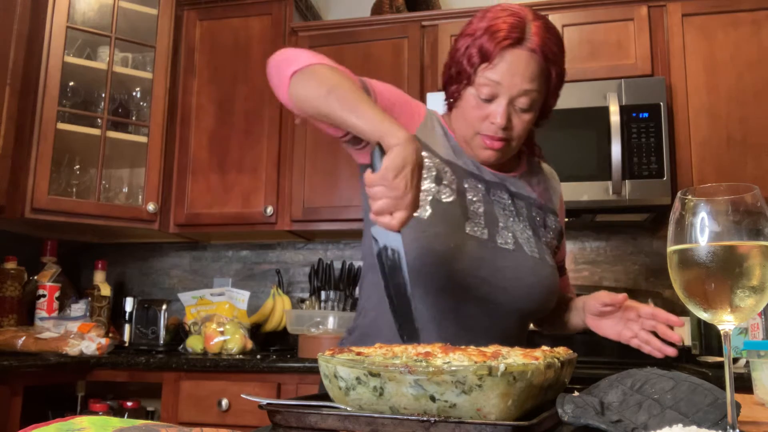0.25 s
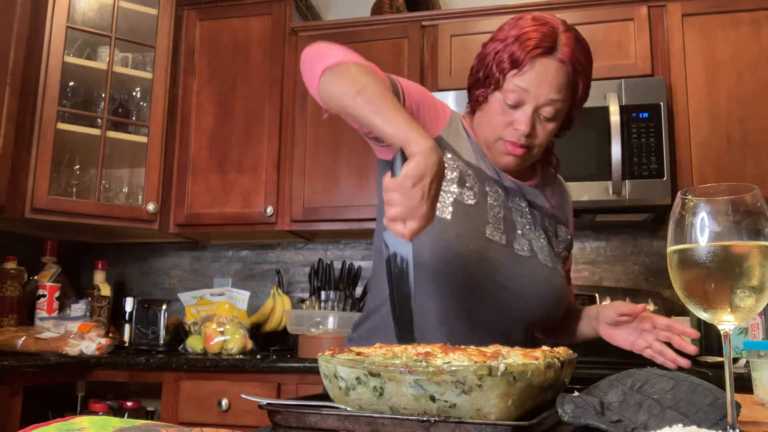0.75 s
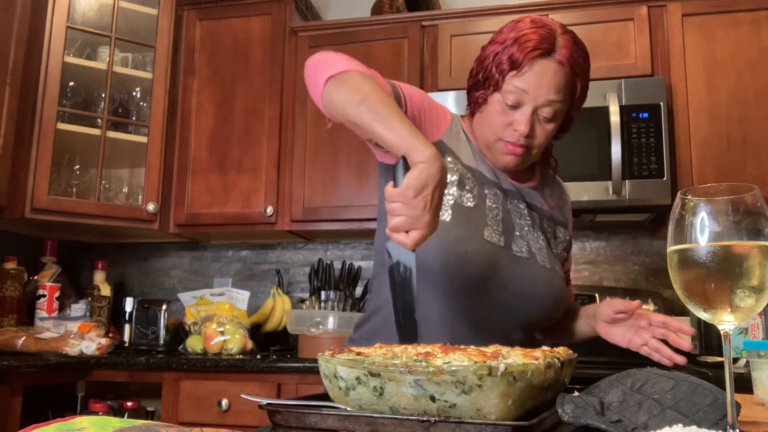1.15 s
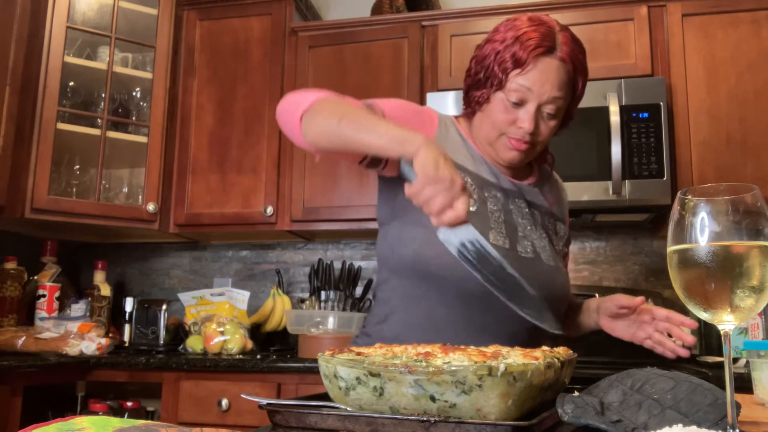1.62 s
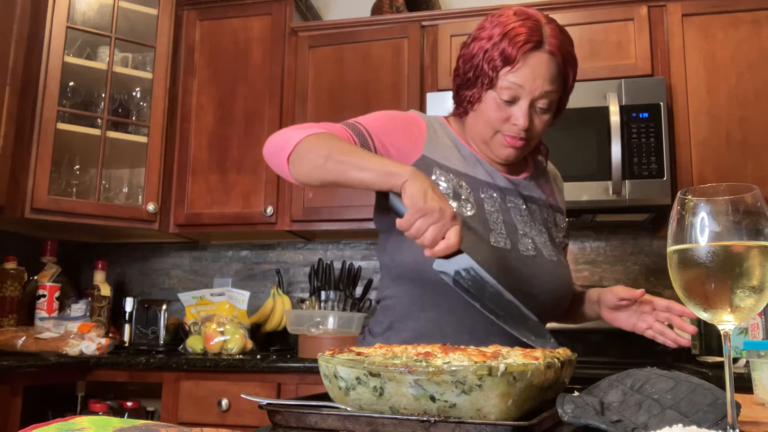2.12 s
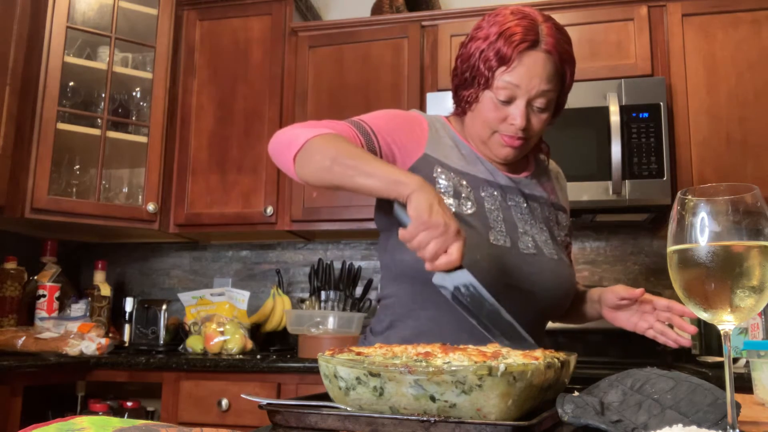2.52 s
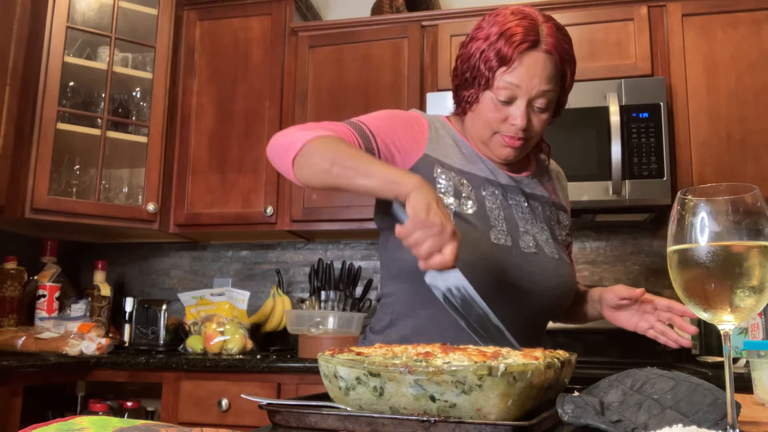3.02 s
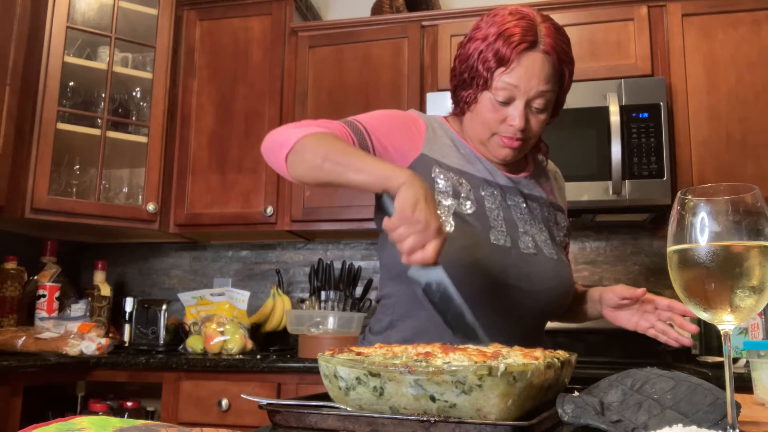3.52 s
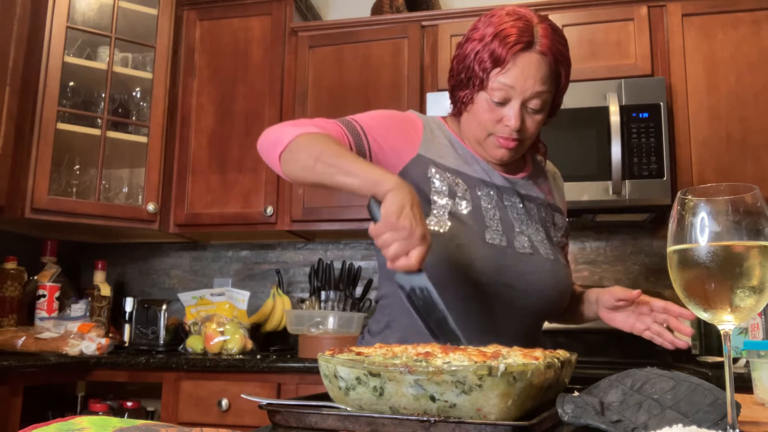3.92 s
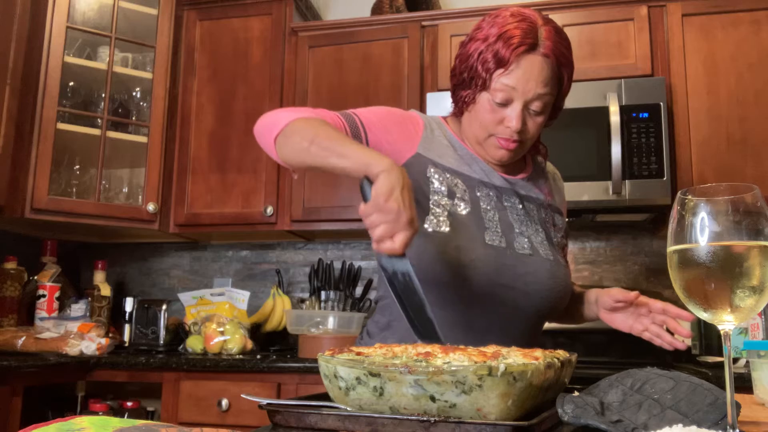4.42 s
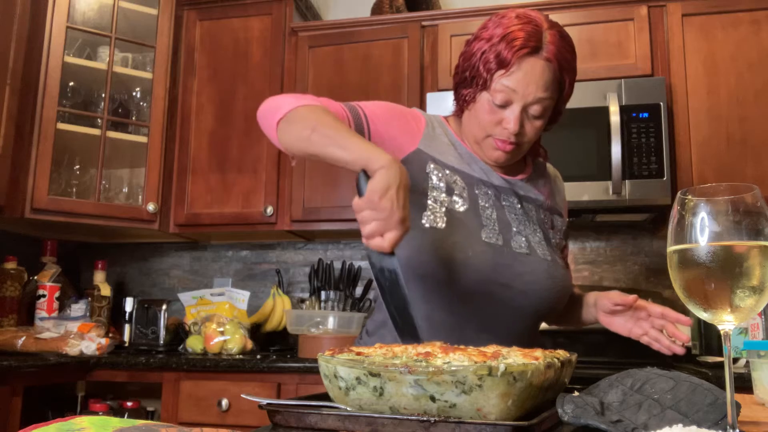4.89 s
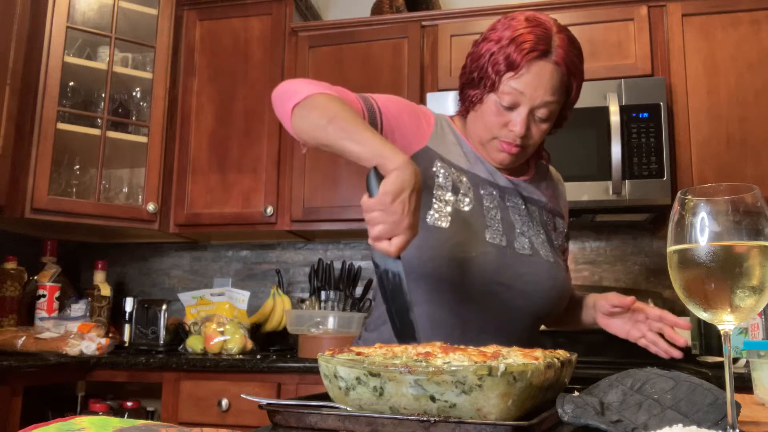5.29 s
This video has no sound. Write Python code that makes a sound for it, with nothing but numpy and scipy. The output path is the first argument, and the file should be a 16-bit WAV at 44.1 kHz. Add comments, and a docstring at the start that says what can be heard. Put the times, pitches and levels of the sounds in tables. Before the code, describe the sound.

A large knife cuts through lasagna in a glass dish on a metal tray, heard from one microphone near the worktop. Each stroke ends in a knock that mixes a worktop thud, a damped glass clunk and a brief ring of the blade. From the start to about 1.4 seconds, light knocks come quickly and unevenly, with the dish chattering on the tray and a faint rasp of crust and sauce. A rattling knock follows at 1.9 seconds and a soft, dull thud at 2.4. The loudest, heaviest knocks land at 2.9 and 3.3 seconds. Cleaner, glassier knocks follow at about 3.6, 4.0, 4.4 and 4.7 seconds. At 5.3 seconds another knock rocks the dish, which rattles until a small tap near 5.5. The kitchen adds a short reverberation, with steady quiet air noise and a low appliance hum behind everything.

```python
"""Cutting lasagna in a kitchen

One microphone near the worktop, where a large knife chops through lasagna in a glass dish on a metal tray.
Each stroke ends in a knock on the bottom: the worktop thuds, the food-damped glass clunks, the blade rings.
Some strokes rock the dish, which chatters on the tray. Crust and sauce hiss softly along the blade.
The room answers with a short reverberation; behind it all lie air noise and a low appliance hum."""
import sys
import numpy as np
from scipy import signal
from scipy.fft import rfft, irfft
from scipy.io import wavfile
from scipy.ndimage import uniform_filter1d

SR = 44100
rng = np.random.default_rng(int(sys.argv[2]) if len(sys.argv) > 2 else 0)


def output_pcm(signal):
    """Save a mono or channel-first signal as 16-bit PCM at the path in sys.argv[1].

    Samples are clipped to [-1, 1] before scaling.
    """
    pcm = np.clip(np.atleast_2d(signal).T, -1, 1) * 32767
    wavfile.write(sys.argv[1], SR, np.round(pcm).astype(np.int16))


N = 244755
TIME = np.arange(N) / SR

# steady air noise of the room: (frequency [Hz], relative density [dB])
AIR_SPECTRUM = [(18, -61), (30, -32), (86, -8.5), (131, -3.5), (153, -20), (184, -5), (345, -3), (374, -20),
                (404, -5), (684, -16.5), (780, -15), (1070, -19.5), (3580, -32), (9460, -52),
                (16000, -43.5)]
# first echoes off worktop, cabinets and ceiling: (delay [s], treble level [dB])
ECHOES = [(.0042, -10.5), (.0073, -25.5), (0.0143, -4.5), (0.0183, -3)]
# kitchen reverberation: (frequency [Hz], t60 [s], energy against the direct sound [dB])
REVERB_BANDS = [(100, 0.22, 7.5), (409, 0.51, -10), (790, 0.53, -2), (1260, 0.71, -2.5), (3000, 0.74, 0.5),
                (6040, 0.69, 1.5), (14300, 0.36, 8.5)]

# edge sliding through the food: (time [s], length [s], relative crust level [dB])
SLICES = [(0.079, 0.041, -45.5), (0.674, 0.053, -60.5), (0.848, 0.069, -59), (0.997, 0.028, -59),
          (1.426, 0.026, -72), (1.99, 0.0046, -67)]
# rasp of the crust: (frequency [Hz], relative density [dB])
CRUST_SPECTRUM = [(800, 5), (1500, 11.5), (3500, 1.5), (6000, -2), (8000, -11), (11000, -16), (16000, -11)]
# sticky crackle of sauce: (frequency [Hz], relative density [dB])
SAUCE_SPECTRUM = [(3000, -8), (10000, -21), (13000, 3), (16000, -14)]
# dull puff of squashed pasta: (frequency [Hz], relative density [dB])
SQUASH_SPECTRUM = [(100, -44), (400, 1.5), (600, -7), (680, -8.5), (770, 1), (870, 2.5), (1000, -10),
                   (1250, -2), (1600, -16), (2700, -23.5), (4000, -34.5)]
# gritty contact of metal and glass: (frequency [Hz], relative density [dB])
CRUNCH_SPECTRUM = [(800, -4.5), (2000, 8.5), (4000, 8), (6000, -1), (7300, -13), (10000, -21),
                   (13000, -19.5), (16000, -20)]
# crowded short modes of the tray: (frequency [Hz], relative density [dB])
TRAY_SPECTRUM = [(150, -18.5), (400, 11.5), (700, -6), (950, 6.5), (1300, 3), (1850, 0.5), (2400, -10),
                 (4000, -32), (8000, -54)]

# clear modes of the metal tray: (frequency [Hz], relative level [dB], t60 [s])
TRAY_MODES = [(560, -6, .04), (660, -7, .04), (790, -4, .05), (905, -4, .06), (960, -3, .05),
              (1090, -2, .05), (1165, -3, .06), (1250, -2, .06), (1453, -4, .06), (1642, -2, .12),
              (1762, -6, .1), (1920, -8, .04), (2250, -15, .04)]
# low modes of the worktop: (frequency [Hz], relative level [dB], t60 [s])
WORKTOP_MODES = [(329, -14, .16), (382, -2, .09), (426, 0, .09), (478, -7, .1), (506, -7, .13)]
# modes of the filled glass dish: (frequency [Hz], relative level [dB], t60 [s])
GLASS_MODES = [(760, -14, .07), (815, -10, .08), (868, -11, .09), (1015, -13, .06), (1945, -13, .05),
               (2440, -20, .07), (1180, -5, .08), (1235, -3, .08), (1288, 0, .09), (1385, -6, .08),
               (1567, -13, .09), (1642, -9, .13)]
# bright modes of the blade: (frequency [Hz], relative level [dB], t60 [s])
BLADE_MODES = [(2440, 0, .07), (2660, -1, .06), (3025, -5, .07), (3260, 0, .06), (3400, -2, .06),
               (3650, -1, .09), (3850, -4, .05), (4180, -7, .07), (4590, 1, .07), (4790, -4, .05),
               (4990, -2, .06), (5400, -3, .06), (5720, -3, .07), (6200, -7, .07)]

# knife pushing the dish along the tray just before a knock: (time [s], length [s], relative level [dB])
DRAGS = [(0.847, .032, -42.5), (1.173, .05, -48), (5.419, 0.035, -48)]
# knife reaching the bottom: (time [s], relative force [dB], pasta under the edge [0-1], rocking [0-1])
KNOCKS = [(0.001, -34, 0, 0.23), (0.344, -54.5, 0.13, 0.25), (0.499, -30.5, 0.16, 0.36),
          (0.833, -44.5, 0.49, 0.8), (0.88, -31.5, 0, 0.3), (0.994, -36, 0.09, .95),
          (1.201, -42.5, 0.5, .4), (1.221, -34.5, 0, 0.21), (1.321, -33, 0.23, 0.67),
          (1.925, -32.5, 0.41, 0.51), (2.369, -38, 0.91, 0), (2.904, -21, 0.6, 0.21),
          (3.314, -21.5, 0.38, 0.1), (3.645, -27, 0.11, 0.13), (4.015, -31.5, 0.07, 0.01),
          (4.370, -28, 0.01, 0.08), (4.681, -25.5, 0.03, 0), (5.294, -29.5, 0.23, 0.89),
          (5.463, -43, 0.24, 0.63)]
# each part's answer to a knock: (relative gain [dB], change on full pasta [dB], at full rocking [dB])
WORKTOP_ANSWER = (-0.87, 9.5, -9.5)
FOOD_ANSWER = (-14.5, 20.04, 14.3)
GLASS_ANSWER = (3.36, -20, -23)
TRAY_ANSWER = (-3, -15.5, 10)
BLADE_ANSWER = (-7, -25, -1.5)


def from_db(db):
    """Decibels to gain."""
    return 10 ** (np.asarray(db) / 20)


def unit_rms(x):
    """Scale to rms 1."""
    return x / np.sqrt(np.mean(x ** 2) + 1e-20)


def unit_attack(x):
    """Scale to rms 1 over the first 20 ms."""
    return x / np.sqrt(np.mean(x[:SR // 50] ** 2))


def at_hz(points, hz):
    """Read (frequency, value) points on a log-frequency axis."""
    centres, values = np.transpose(points)
    return np.interp(np.log(np.maximum(hz, 1)), np.log(centres), values)


def filtered(x, order, hz, kind):
    """Butterworth filter."""
    return signal.sosfilt(signal.butter(order, hz, kind, fs=SR, output="sos"), x)


def add(out, start_s, sound):
    """Mix a sound in from start_s on."""
    start = max(round(start_s * SR), 0)
    out[start:start + len(sound)] += sound[:len(out) - start]


def noise(spectrum, size, grain_db=0):
    """Noise of a given spectrum, smooth or broken into grains of 32 samples; rms 1."""
    roughness = np.clip(rng.standard_normal(size // 32 + 1), -2, 2)
    grains = from_db(grain_db * np.repeat(roughness, 32)[:size])
    colour = from_db(at_hz(spectrum, np.fft.rfftfreq(size, 1 / SR)))
    return unit_rms(irfft(rfft(rng.standard_normal(size) * grains) * colour, size))


def burst(spectrum, rise_s, decay_s, grain_db=0, size=8000):
    """Countless crowded modes or tiny fractures merge into a dying puff of noise."""
    t = TIME[:size]
    envelope = (1 - np.exp(-t / rise_s)) * np.exp(-t / decay_s)
    return unit_attack(noise(spectrum, size, grain_db) * envelope)


def struck(modes, vary_db, polarity=-1, size=8000):
    """One blow rings each mode unevenly; neighbours swing against (-1) or with (1) each other."""
    hz, db, t60 = np.transpose(modes)[:, :, None]
    t = TIME[:size]
    uneven_db = db + vary_db * rng.standard_normal(db.shape)
    strength = polarity ** np.arange(len(modes))[:, None] * from_db(uneven_db)
    partials = strength * np.exp(-np.log(1000) * t / t60) * np.sin(2 * np.pi * hz * t)
    return unit_attack(partials.sum(axis=0))


def room_tone(air_db=-56.5, hum_hz=98.2, hum_db=-70.5):
    """Steady air noise and the hum of an appliance in the background."""
    hum = np.sqrt(2) * np.sin(2 * np.pi * (hum_hz * TIME + rng.random()))
    return from_db(air_db) * noise(AIR_SPECTRUM, N) + from_db(hum_db) * hum


def kitchen(sound, build_s=0.0015, blur_hz=45, size=32768):
    """At the microphone: the direct sound, a few hard echoes, then a diffuse tail that dies by band."""
    direct = np.pad(sound, (0, size - len(sound)))
    hz = np.fft.rfftfreq(size, 1 / SR)
    out = direct.copy()
    bright = filtered(direct, 1, 1800, "high")   # small surfaces return mostly highs
    for delay, db in ECHOES:
        add(out, delay, from_db(db) * bright)
    # the tail keeps the colour of the sound, but its phases are scattered
    power = uniform_filter1d(np.abs(rfft(direct)) ** 2, size=int(blur_hz / hz[1]))
    scattered = np.sqrt(np.abs(power)) * rfft(rng.standard_normal(size))
    arriving = signal.lfilter([0, 1], [1, -np.exp(-1 / (build_s * SR))], direct ** 2 + 1e-18)
    centres, t60s, wet_dbs = np.transpose(REVERB_BANDS)
    for weights, t60, wet_db in zip(np.eye(len(centres)), t60s, wet_dbs):
        band = irfft(scattered * at_hz(np.column_stack([centres, weights]), hz), size)
        stored = signal.lfilter([1], [1, -np.exp(-2 * np.log(1000) / (t60 * SR))], arriving)
        out += from_db(wet_db) * band * np.sqrt(stored / stored.sum())
    return out


def slices():
    """Crust rasps and sauce crackles along the blade while it moves."""
    out = np.zeros(N)
    for start_s, length_s, crust_db in SLICES:
        size = int(length_s * SR)
        stroke = np.sqrt(np.sin(np.pi * np.arange(size) / size))
        crust = from_db(crust_db) * noise(CRUST_SPECTRUM, size, grain_db=5.5)
        sauce = from_db(-75) * noise(SAUCE_SPECTRUM, size, grain_db=3)
        add(out, start_s, from_db(-3) * kitchen(stroke * (crust + sauce)))
    return out


def tray_tap():
    """The thin sheet has a few clear modes in a crowd of short ones."""
    ring = from_db(-2) * struck(TRAY_MODES, vary_db=3)
    return ring + burst(TRAY_SPECTRUM, rise_s=0.0025, decay_s=0.0027)


def rattle(length_s, level_db, fade_db=0, touches_per_s=220):
    """The dish touches the tray in a run of quick uneven taps."""
    count = max(int(length_s * touches_per_s), 1)
    taps = np.zeros(SR // 4)
    for progress in (np.arange(count) + rng.random(count)) / count:
        gain = from_db(level_db - 8 + progress * fade_db + rng.uniform(-4, 4))
        thud = from_db(-6.5) * struck(WORKTOP_MODES, vary_db=5)
        clink = tray_tap()
        grit = from_db(-17.5) * burst(CRUNCH_SPECTRUM, rise_s=0.00043, decay_s=0.0076)
        add(taps, progress * length_s, gain * rng.choice([-1, 1]) * (clink + thud + grit))
    return kitchen(taps)


def chatter(wait_s=0.02, full_rock_s=0.07):
    """The dish rattles while pushed, and after a knock: the more it rocks, the louder and longer."""
    out = np.zeros(N)
    for start_s, length_s, level_db in DRAGS:
        add(out, start_s, rattle(length_s, level_db))
    for start_s, force_db, _, rocking in KNOCKS:
        if rocking > 0:
            settling = rattle(rocking * full_rock_s, force_db - 6.5, fade_db=-8)
            add(out, start_s + wait_s, rocking * settling)
    return out


def worktop_thud():
    """The heavy dish and worktop take a few cycles to get moving, which narrows the thud."""
    ring = struck(WORKTOP_MODES, vary_db=3.5, polarity=0.97)
    return from_db(7) * filtered(ring, 1, [360, 540], "band")


def blade_strike(reflection_s=0.011):
    """The blade rings as its edge bites on the glass; a sharp, bright reflection follows just after."""
    edge = struck(BLADE_MODES, vary_db=2)
    edge += burst(CRUNCH_SPECTRUM, rise_s=0.0011, decay_s=0.0037, grain_db=0.5)
    add(edge, reflection_s, burst(CRUNCH_SPECTRUM, rise_s=0.00045, decay_s=0.013, grain_db=2))
    return from_db(-8.5) * edge


def cushioned(x, pasta, bare_glass_hz=3140, drop_octaves=0.83):
    """Pasta under the edge softens the contact and takes off the highs."""
    return filtered(x, 2, bare_glass_hz * 2 ** (-drop_octaves * pasta), "low")


def answer(part, force_db, pasta, rocking):
    """Gain of one part: pasta turns the blow into a thud, rocking hands it from glass to tray."""
    own_db, pasta_db, rocking_db = part
    return from_db(force_db + own_db + pasta * pasta_db + rocking * rocking_db)


def knocks(thud_lag_s=0.002487):
    """In the foreground, each stroke squashes the food and shakes worktop, glass, tray and blade."""
    out = np.zeros(N)
    for start_s, force_db, pasta, rocking in KNOCKS:
        stroke = force_db, pasta, rocking
        thud = answer(WORKTOP_ANSWER, *stroke) * worktop_thud()
        squash = answer(FOOD_ANSWER, *stroke) * burst(SQUASH_SPECTRUM, rise_s=0.00033, decay_s=0.015)
        glass = answer(GLASS_ANSWER, *stroke) * struck(GLASS_MODES, vary_db=5, polarity=1)
        tray = answer(TRAY_ANSWER, *stroke) * tray_tap()
        blade = answer(BLADE_ANSWER, *stroke) * blade_strike()
        knock = cushioned(squash + glass + tray, pasta) + blade
        add(knock, thud_lag_s, thud)   # the blow reaches the worktop after the glass
        add(out, start_s, from_db(-5) * kitchen(knock))
    return out


def scene(radiate_hz=230):
    """The cutting in front, the room tone behind, in mono; small bodies radiate no deep bass."""
    cutting = filtered(knocks() + chatter() + slices(), 2, radiate_hz, "high")
    return (cutting + room_tone())[None]


def record(dry, cutoff_hz=16000):
    """The microphone signal passes a steep low-pass."""
    return signal.sosfilt(signal.ellip(10, .2, 70, cutoff_hz, fs=SR, output="sos"), dry)


dry = scene()
out = record(dry)
output_pcm(out)
```